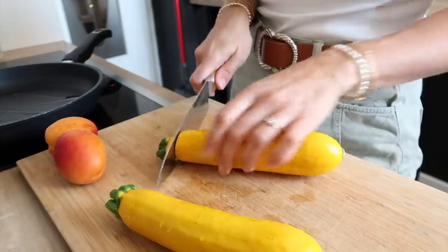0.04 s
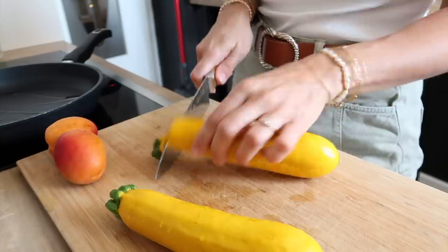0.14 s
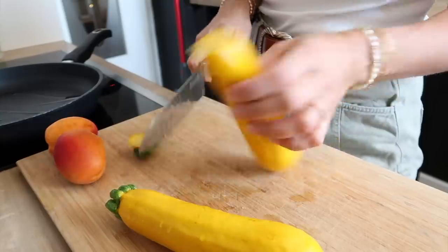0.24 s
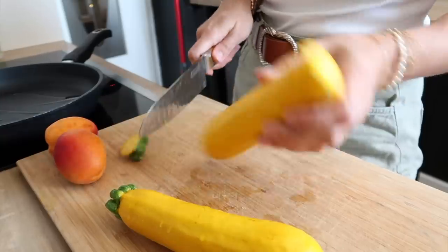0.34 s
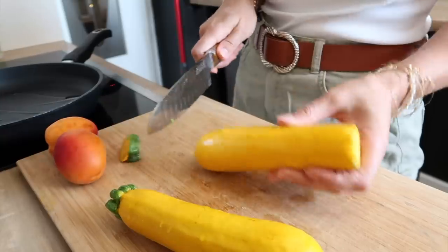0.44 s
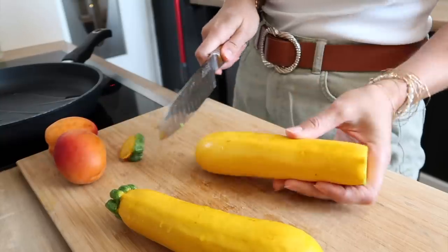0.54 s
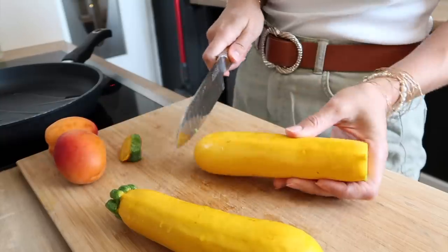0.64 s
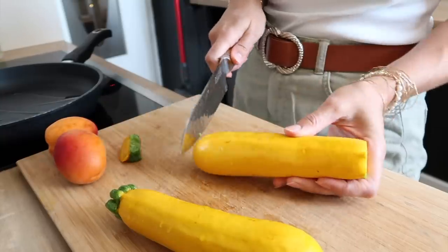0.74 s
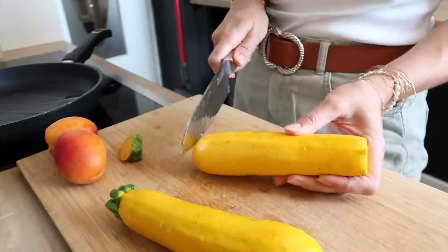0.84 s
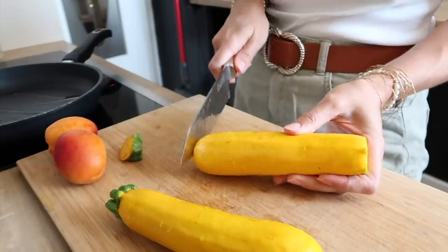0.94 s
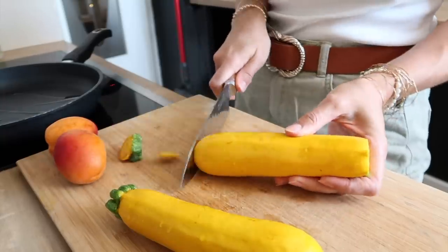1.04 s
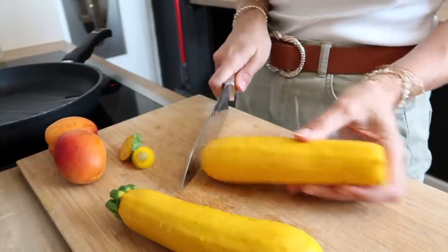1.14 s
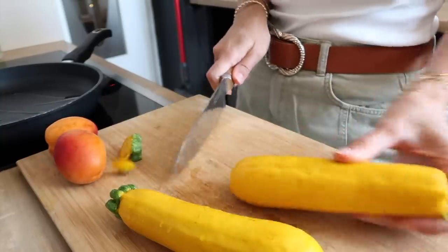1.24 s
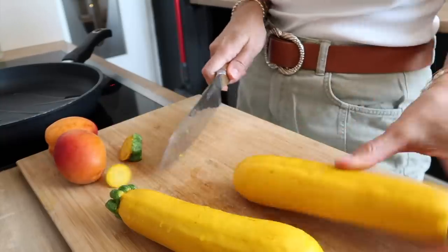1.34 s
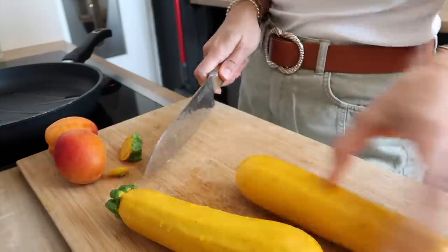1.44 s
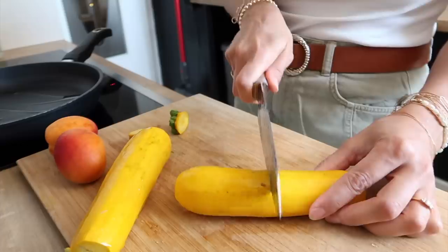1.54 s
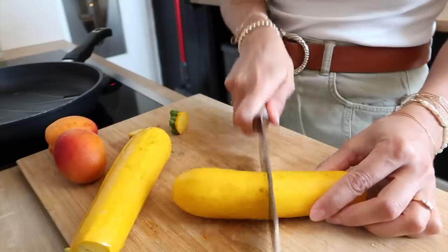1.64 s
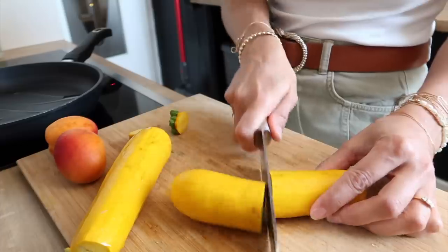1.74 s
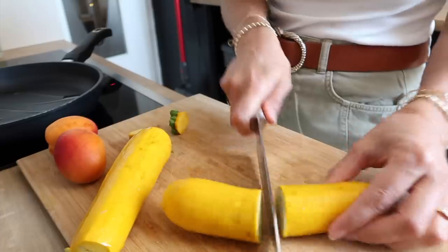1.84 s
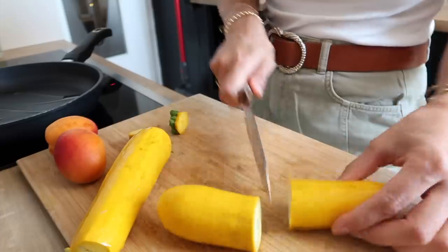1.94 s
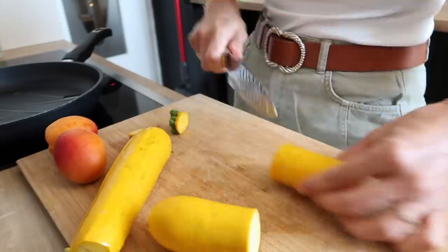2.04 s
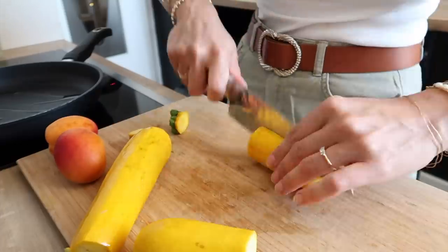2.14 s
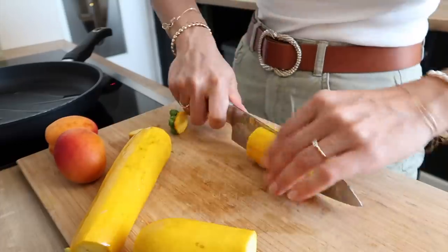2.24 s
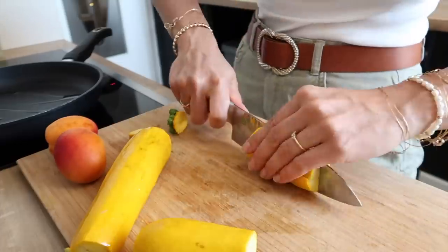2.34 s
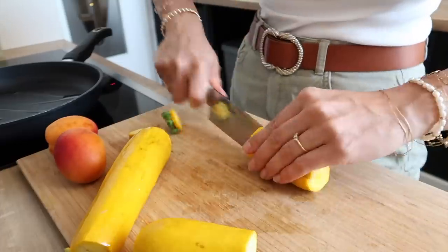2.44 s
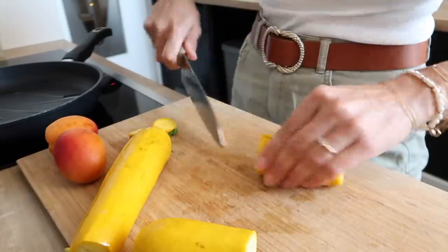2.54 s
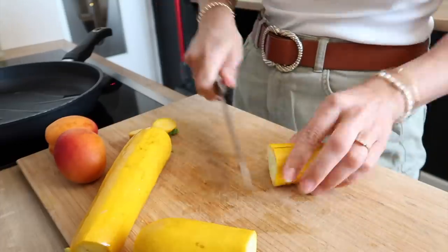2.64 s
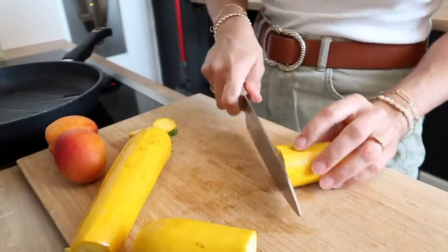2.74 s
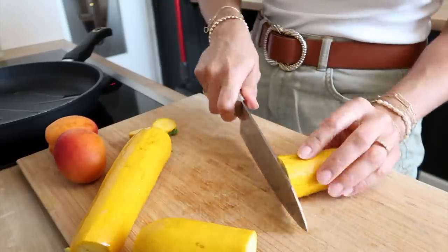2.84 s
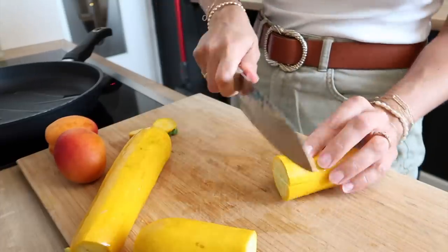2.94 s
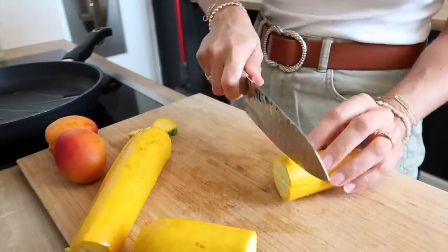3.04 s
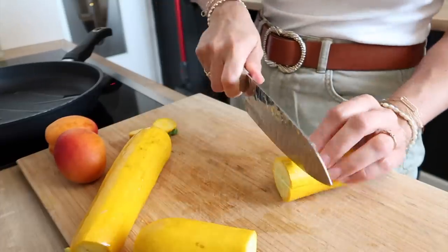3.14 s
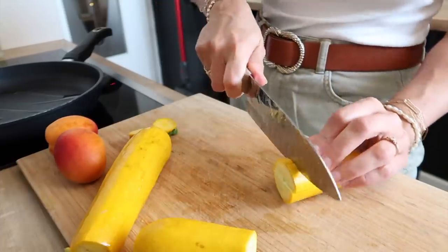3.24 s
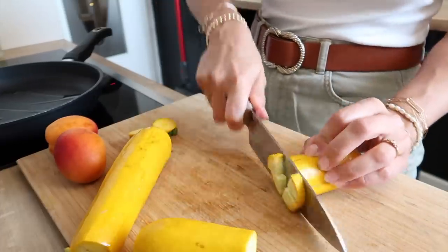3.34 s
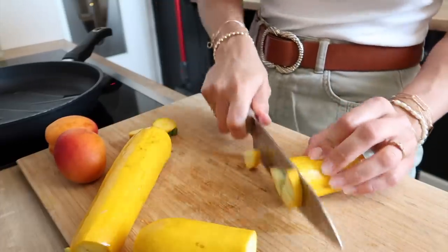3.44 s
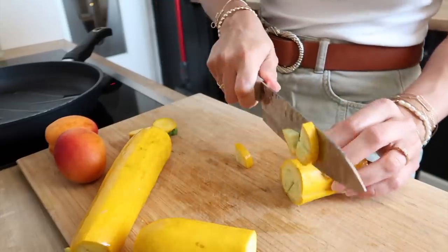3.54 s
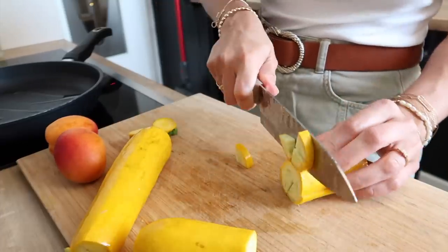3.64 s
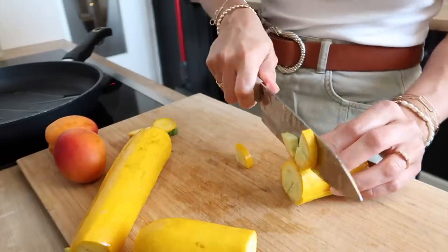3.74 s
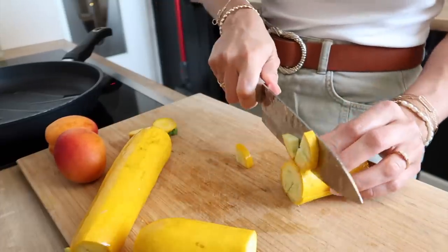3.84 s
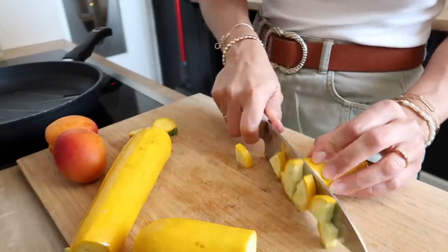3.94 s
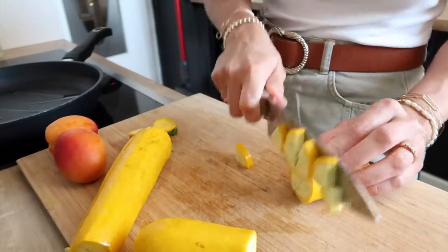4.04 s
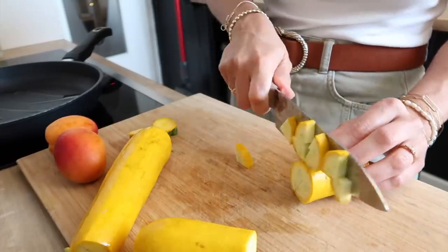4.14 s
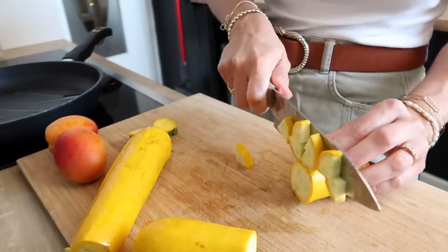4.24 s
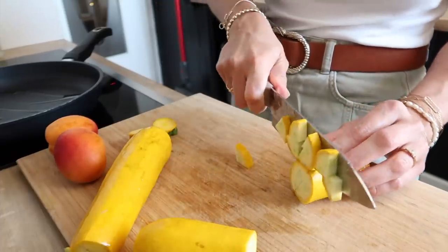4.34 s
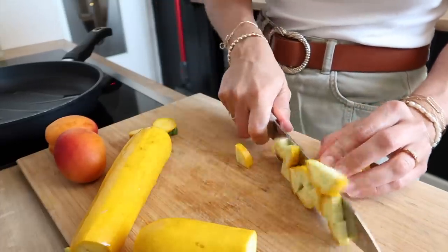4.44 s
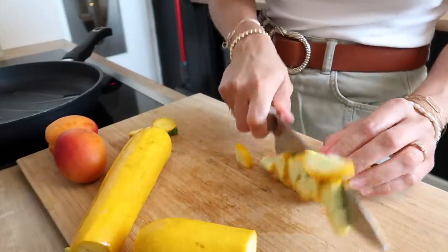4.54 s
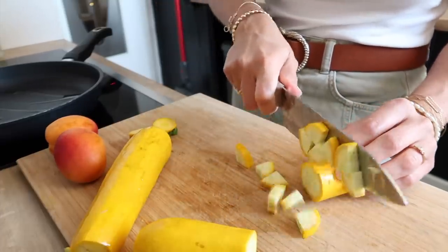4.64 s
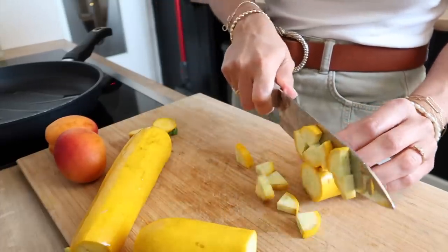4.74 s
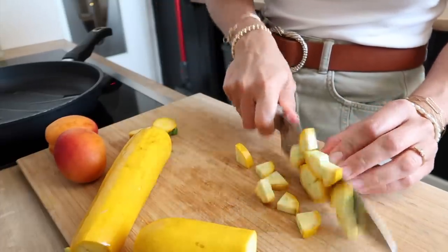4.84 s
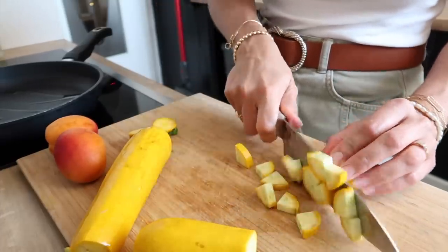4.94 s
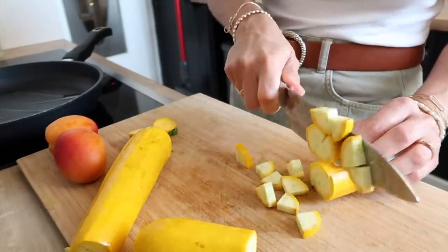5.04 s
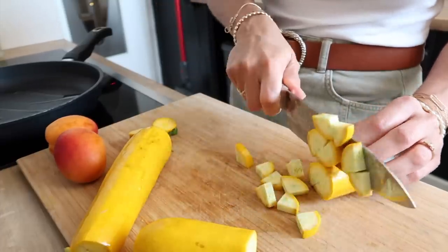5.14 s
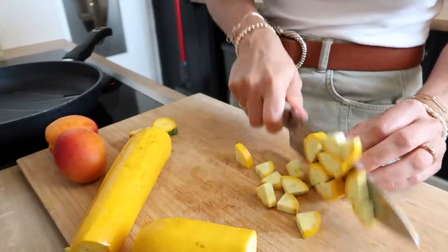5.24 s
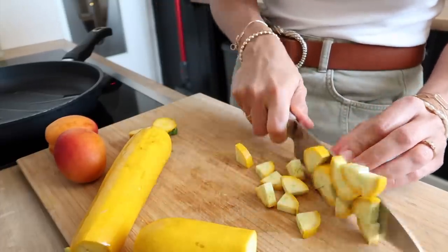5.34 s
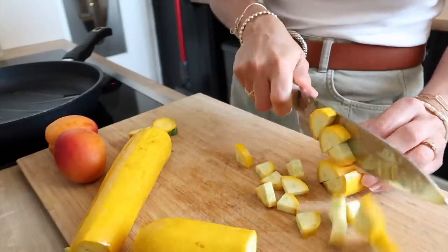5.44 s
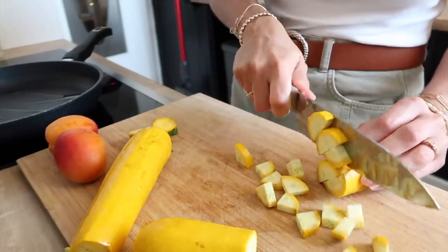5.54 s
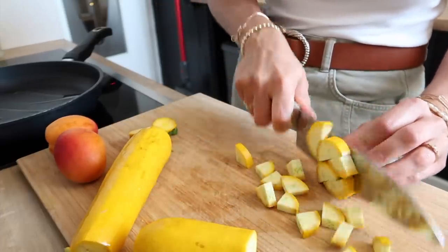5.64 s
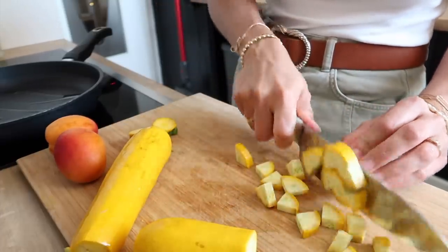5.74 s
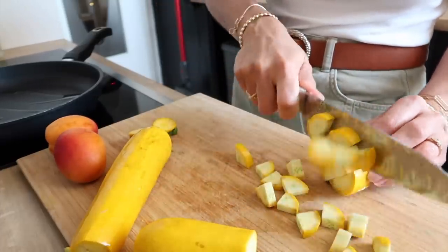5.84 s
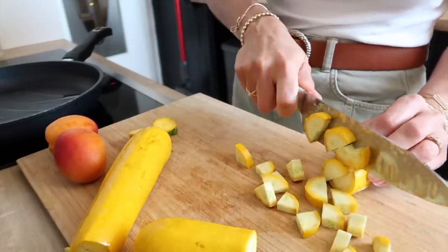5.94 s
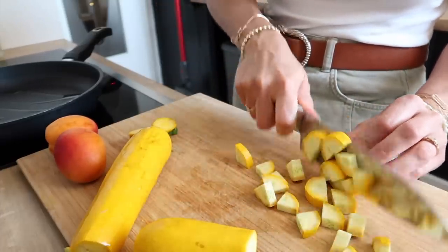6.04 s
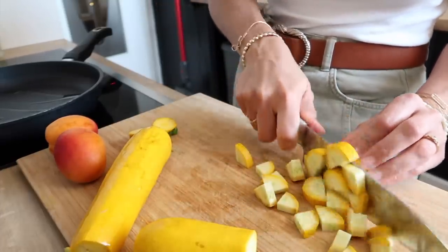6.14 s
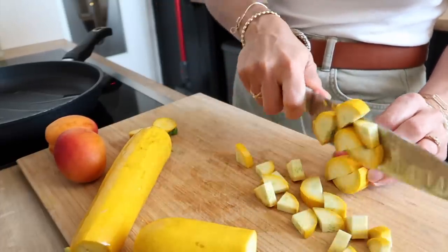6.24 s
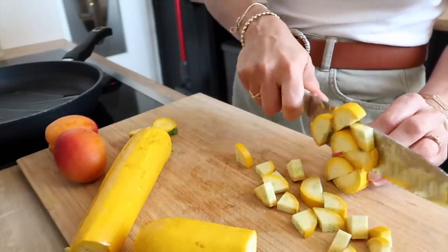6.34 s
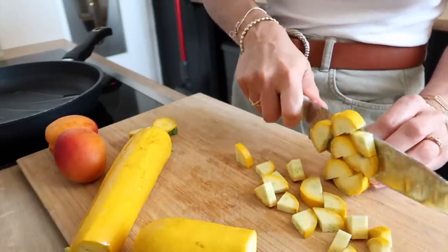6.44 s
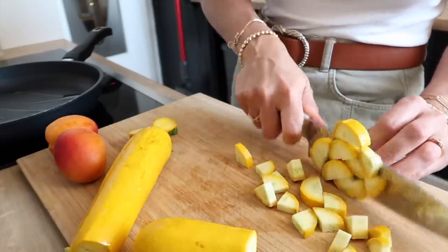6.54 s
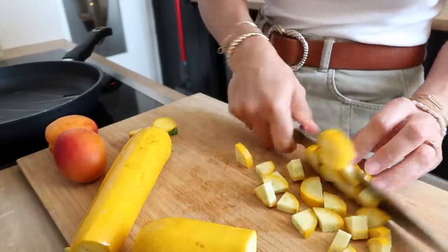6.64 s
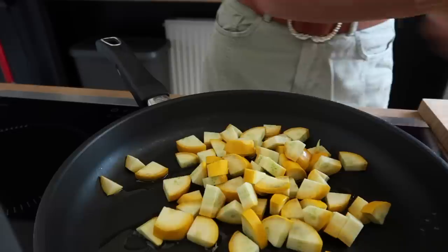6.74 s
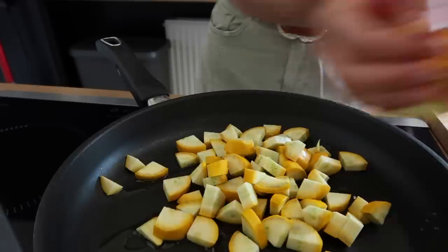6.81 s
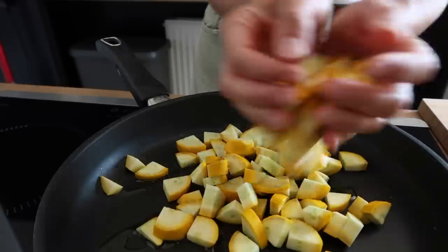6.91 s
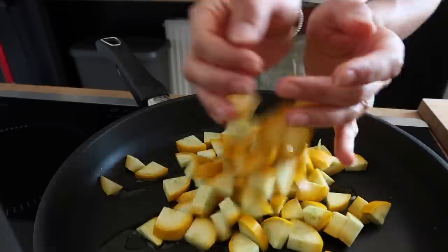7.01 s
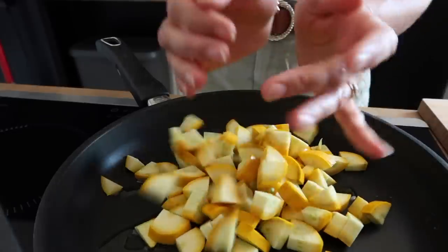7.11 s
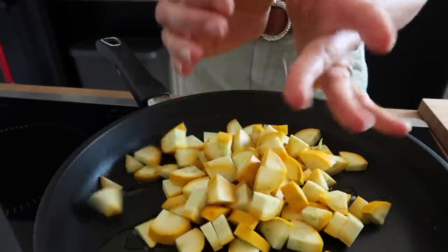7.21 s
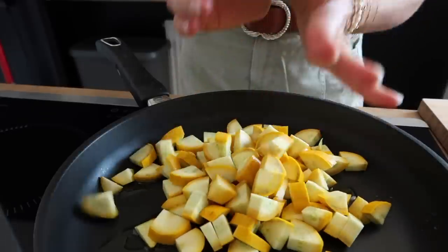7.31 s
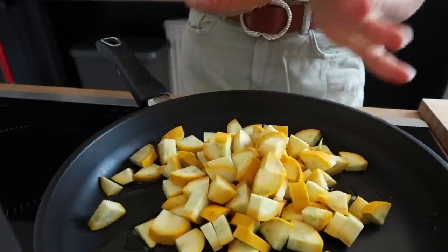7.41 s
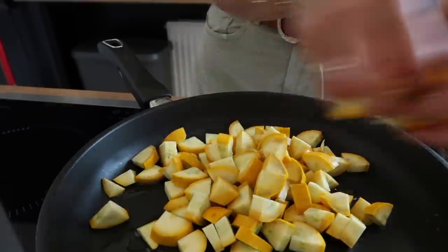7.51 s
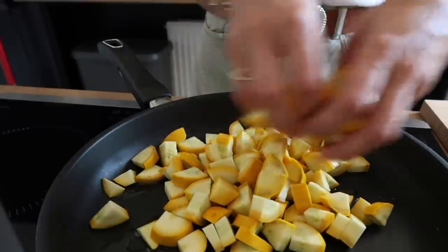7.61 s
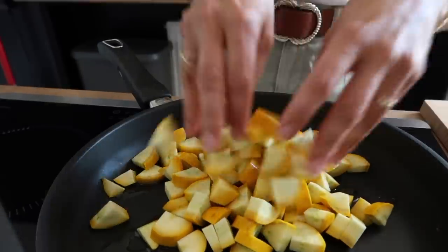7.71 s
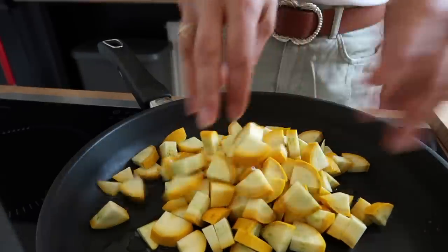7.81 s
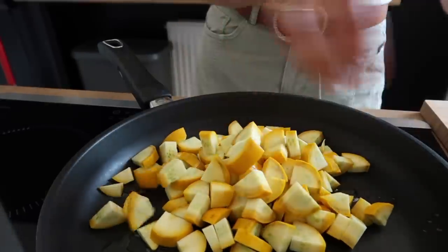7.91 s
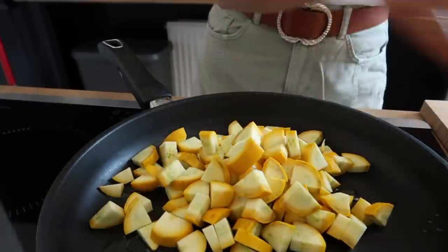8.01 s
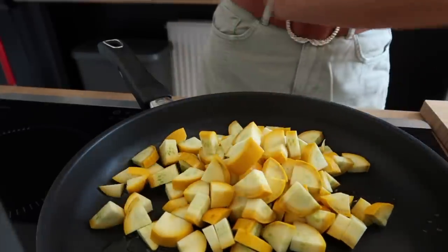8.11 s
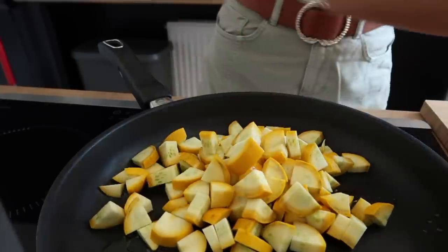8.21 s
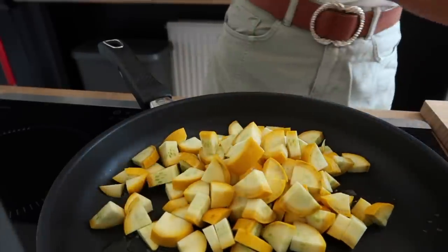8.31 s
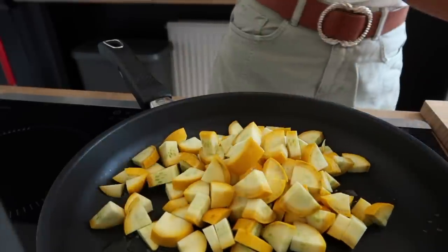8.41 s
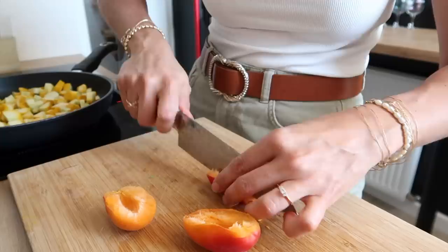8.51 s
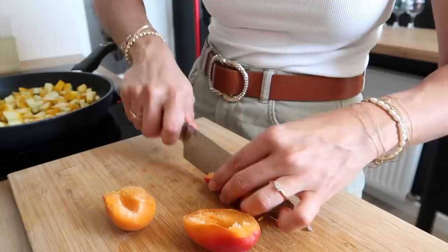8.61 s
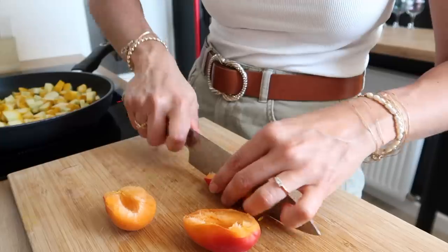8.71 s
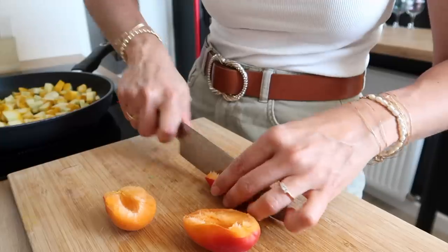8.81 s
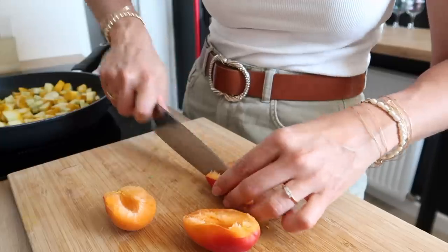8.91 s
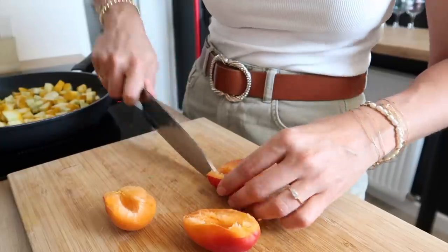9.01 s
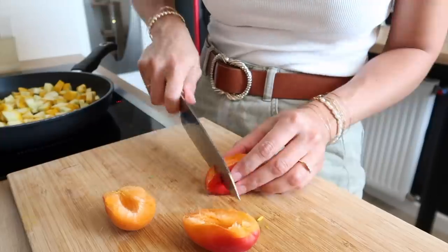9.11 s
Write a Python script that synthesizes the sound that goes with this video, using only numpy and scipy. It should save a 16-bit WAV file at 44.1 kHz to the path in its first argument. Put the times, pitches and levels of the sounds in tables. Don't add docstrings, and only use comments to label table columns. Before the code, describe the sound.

Hard chops of a blade on a thick wooden board, crisp skin snapping, soft pieces thudding into a pan, and two last cuts in a small kitchen.

```python
import sys
import numpy as np
from scipy import signal
from scipy.fft import rfft, irfft, next_fast_len
from scipy.io import wavfile
from scipy.ndimage import uniform_filter1d

SR = 44100
rng = np.random.default_rng(int(sys.argv[2]) if len(sys.argv) > 2 else 0)


def log_audio(samples):
    frames = np.atleast_2d(samples).T
    limited = np.clip(frames, -1, 1)
    pcm = np.round(limited * 32767).astype(np.int16)
    wavfile.write(sys.argv[1], SR, pcm)


def magnitude_from_level(level_db):
    exponent = np.asarray(level_db, float) / 20
    return 10 ** exponent


N = 404397


def evened(x):
    return x / np.sqrt(np.mean(x ** 2) + 1e-20)


def read(points, hz, axis=1):
    columns = np.transpose(points)
    return np.interp(np.log(hz + 1), np.log(columns[0] + 1), columns[axis])


def filtered(x, points, axis=1):
    gain = magnitude_from_level(read(points, np.fft.rfftfreq(len(x), 1 / SR), axis))
    return irfft(rfft(x) * gain, len(x))


def coloured(x, points):
    return evened(filtered(x, points))


def cushioned(x, count):
    contact = np.hanning(count)
    return np.convolve(x, contact / contact.sum())[:len(x)]


def ring(modes, spread=0., spread_db=0., size=SR // 3, sharp=False):
    hz, db, t60 = np.transpose(modes)[:, :, None]
    luck = rng.standard_normal((2, len(modes), 1))
    t = np.arange(size) / SR
    swing = -1 if sharp else (-1) ** np.arange(len(modes))[:, None]
    decay = magnitude_from_level(db + spread_db * luck[0] - 60 * t / t60)
    x = (swing * decay * np.sin(2 * np.pi * hz * (1 + spread * luck[1]) * t)).sum(0)
    return x / abs(x).max()


def burst(points, t60, size):
    x = coloured(rng.standard_normal(size), points) * magnitude_from_level(-60 * np.arange(size) / SR / t60)
    return x / abs(x).max()


def grains(size, per_s, spread_db):
    strength = magnitude_from_level(spread_db * np.minimum(rng.exponential(1, size), 3.5))
    return rng.standard_normal(size) * strength * (rng.random(size) < per_s / SR)


def clock(length):
    return np.arange(2 * round(max(length, .01) * SR / 2)) / SR


def series(hits, body):
    first = hits[0][0]
    x = np.zeros(round((hits[-1][0] - first) * SR) + SR // 3)
    for s, *row in hits:
        blow, at = body(*row), round((s - first) * SR)
        x[at:at + len(blow)] += blow
    return x


# pitch_hz, side_minus_mid_db
STEREO_WIDTH = [(60, -48), (250, -14.5), (700, -14), (1500, -12.5), (3000, -9), (6000, -4), (13000, 1.5)]


def stereo(mid, side):
    side = filtered(side, STEREO_WIDTH)
    return np.array([mid + side, mid - side])


# pitch_hz, level_db (per Hz)
ROOM_AIR = [(25, -21.5), (60, -1), (110, 8), (200, 3.5), (350, -4.5), (700, -7.5), (1500, -12.5),
            (3000, -17.5), (5000, -25), (8000, -30), (12000, -41), (16000, -49.5)]
# pitch_hz, level_db, width_hz
FRIDGE_LINES = [(49.86, -16, 0.64), (98, -9.5, 29), (464, -26.5, 7.7), (483, -19, 4), (717, -27, 13),
                (13011, -49, 3)]
# time_s, level_db
WHINE_LEVEL = [(0, -1), (2.6, 0.5), (2.9, 0), (3.95, -4), (4.05, 4.5), (6.7, 2.5), (6.75, 5), (9.2, -1)]
# start_s, hum_db
GAIN_DUCKS = [(0.0, -51), (1.075, -53.5), (1.515, -42), (1.745, -55.5), (2.148, -38.5), (2.254, -45.5),
              (2.638, -41), (2.9, -45), (3.409, -49.5), (3.99, -54.5), (4.5, -53), (4.92, -56),
              (5.33, -52.5), (5.73, -49.5), (6.13, -52.5), (6.625, -43), (6.711, -48), (7.1, -52.5),
              (7.851, -50), (8.41, -47), (8.546, -38.5), (8.667, -47), (9.085, -41.5)]
# end_s, tail_length_factor (up to there), air_over_hum_db
SCENE_CHANGES = [
    (1.517, 2.1, -8.5),
    (2.147, 1.7, -5.5),
    (2.638, 1.01, -8),
    (6.712, 1.1, -10.5),
    (8.547, 1.17, -0.5),
    (9.083, 2.6, -5.5),
    (9.2, 0.95, -8.5),
]


def background():
    recover_db_s = 11
    size = next_fast_len(N)
    t, hz = np.arange(size) / SR, np.fft.rfftfreq(size, 1 / SR)
    s, ducked_db = np.transpose(GAIN_DUCKS)
    last = np.maximum(np.searchsorted(s, t, "right") - 1, 0)
    hum_db = uniform_filter1d(ducked_db[last] + recover_db_s * (t - s[last]), size=200)

    hum = np.sqrt(2) * np.sin(2 * np.pi * FRIDGE_LINES[0][0] * t)
    whine_db = np.interp(t, *np.transpose(WHINE_LEVEL))
    for line_hz, db, width in FRIDGE_LINES:
        band = 1 + ((hz - line_hz) / width * 2) ** 4
        line = evened(irfft(rfft(rng.standard_normal(size)) / band, size))
        hum = hum + magnitude_from_level(db + (300 < line_hz < 1000) * whine_db) * line

    ends, _, air_db = np.transpose(SCENE_CHANGES)
    shot = np.minimum(np.searchsorted(ends, t), len(ends) - 1)
    lift = magnitude_from_level(hum_db + air_db[shot])
    mid, side = (coloured(rng.standard_normal(size), ROOM_AIR) for _ in range(2))
    return (magnitude_from_level(hum_db) * hum + stereo(lift * mid, magnitude_from_level(8.0) * lift * side))[:, :N]


def all_round(x):
    span, floor = 1.3, 0.15
    size = next_fast_len(len(x) + 8192)
    z = rfft(x, size)
    power, bins = abs(z) ** 2, np.arange(len(z))
    total = np.cumsum(power)
    lo, hi = bins / span - 1, np.minimum(bins * span + 1, bins[-1])
    smooth = (np.interp(hi, bins, total) - np.interp(lo, bins, total)) / (hi - lo) + 1e-20
    return irfft(z * np.sqrt(smooth / (power + floor * smooth)), size)[:len(x)]


# pitch_hz, t60_s, level_db
KITCHEN_ECHOES = [(85, 0.45, -15.5), (350, 0.12, 5), (802, 0.28, 2), (1400, 0.28, 2.5), (2100, 0.24, -2.5),
                  (4130, 0.25, -4.5), (10040, 0.053, -11), (16250, 0.047, -30)]


def kitchen(x, room_db, longer, single):
    cells = 1600 if abs(x).max() > .1 else 800
    taps = np.zeros((2, cells * 16))
    at = np.arange(cells) * 16 + rng.integers(0, 16, (2, cells))
    np.put_along_axis(taps, at, rng.choice([-1., 1.], at.shape), 1)
    taps *= magnitude_from_level(3.5 * evened(cushioned(rng.standard_normal(cells * 16), count=260)))

    hz, t, z = signal.stft(taps, SR, nperseg=256)
    decay = magnitude_from_level(-60 * t / (longer * read(KITCHEN_ECHOES, hz)[:, None]))
    tail = signal.istft(z * decay, SR, nperseg=256)[1]
    t = np.arange(tail.shape[1]) / SR
    tail *= np.clip((t - .004) / 0.00022, 0, 1)
    tail /= np.sqrt(np.sum(tail[0] ** 2) * 3000 / SR * 2)
    tail = np.array([filtered(port, KITCHEN_ECHOES, axis=2) for port in tail])
    t = np.arange(tail.shape[1]) / SR
    tail *= 1 + magnitude_from_level(0.5) * np.exp(-t / 0.012)

    source = all_round(x) if single else x
    wet = signal.fftconvolve(source[None], magnitude_from_level(room_db - 9.5) * tail, axes=1)
    wet = np.pad(wet, ((0, 0), (0, next_fast_len(wet.shape[1]) - wet.shape[1])))
    direct = np.pad(x, (0, wet.shape[1] - len(x)))
    scatter = evened(rng.standard_normal(128)) / np.sqrt(128)
    slant = magnitude_from_level(-3.0) * signal.oaconvolve(direct, scatter)[:len(direct)]
    return stereo(wet[0] + direct, magnitude_from_level(-3.5) * wet[1] + slant)


def add(mix, s, sound, room_db, single=True):
    end, longer, _ = next(change for change in SCENE_CHANGES if change[0] > s)
    sound, s = sound[max(-round(s * SR), 0):], max(s, 0)
    part = mix[:, round(s * SR):round(end * SR)]
    heard = kitchen(sound, room_db, longer, single)[:, :part.shape[1]]
    left_s = end - s - np.arange(heard.shape[1]) / SR
    part[:, :heard.shape[1]] += heard * np.clip(left_s / .002, 0, 1)


# pitch_hz, level_db, t60_s
BOARD_MODES = [(500, -20, .02), (700, -11, .028), (865, -10, .025), (1070, -6, .022), (1220, -3, .02),
               (1460, 0, .022), (1800, -7, .014), (2050, -12, .009), (2270, -11, .012), (2750, -16, .007),
               (3150, -14, .007), (3750, -17, .005), (4300, -20, .005)]
# pitch_hz, level_db (per Hz)
FIBRE_GRIT = [(300, -35), (700, -1), (1400, 2), (2200, -5), (3500, -3), (6000, -26)]
# pitch_hz, level_db (per Hz)
EDGE_CRACK = [(1500, -37), (3000, 1), (4500, 1), (7000, -10), (10000, -15), (16000, -40.5)]


def wood(crack_db, pitch=0.93, size=2048):
    struck = [(hz, read(BOARD_MODES, hz / pitch ** 1.5), t60) for hz, _, t60 in BOARD_MODES]
    board = ring(struck, .015, 1.5, size=size, sharp=True)
    board += magnitude_from_level(-9) * burst(np.multiply(FIBRE_GRIT, [pitch, 1]), .006, size)
    thin = signal.butter(2, 450 * pitch, "high", fs=SR, output="sos")
    board = signal.sosfilt(thin, cushioned(board, count=12))
    return board + magnitude_from_level(crack_db) * burst(EDGE_CRACK, 0.0016, size)


# pitch_hz, level_db, t60_s
WORKTOP_MODES = [(92.5, -1.5, 0.16), (112.8, -5.5, 0.23), (148, -7.5, 0.12), (201, -2, 0.17),
                 (302.2, -11, 0.01), (455, -16.5, 0.034), (554, -15.5, 0.18)]


def knock(db, crack_db, thump_db, room_db, pitch):
    squash = 1.8
    thump = magnitude_from_level(thump_db - 10.0) * ring(WORKTOP_MODES, 0.02, 1.5)
    thump *= np.minimum(np.arange(len(thump)) / SR / 0.014, 1)
    board = wood(crack_db, pitch, size=len(thump))
    blow = cushioned(np.tanh(squash * board) / np.tanh(squash), count=6)
    return magnitude_from_level(db + 3.0) * np.pad(blow + thump, (40, 0)), room_db


# start_s, peak_db, crack_db, pitch_factor (of the spot struck)
CHOP_HITS = [(-0.001, 11.5, -24, 1.24), (1.068, 16.5, -15.5, 1.3), (1.739, 10.5, -9.5, 1.05),
             (2.246, -6, -8, 0.93), (2.896, -9.5, -11.5, 1.07), (3.401, -4.5, -15, 1.12),
             (3.984, -3, -5, 1.13), (4.493, -1.5, -12.5, 1.165), (4.916, -2, -9.5, 1.13),
             (5.324, -1.5, -12, 1.09), (6.126, -4.5, -11, 1.04), (6.617, 1.5, -22, 1.07),
             (8.658, 2.5, -22, 0.92)]
# start_s, peak_db, crack_db, pitch_factor
REBOUND_HITS = [
    (1.072, 5, -20, 3.1),
    (1.077, -7.5, -24.5, 1.5),
    (1.7426, 7.5, -23.5, .9),
    (1.747, -7, -24, .8),
    (1.752, -12.5, -28.5, 1.6),
]


def chop(db, crack_db, pitch):
    return knock(db, crack_db, -19 - 0.65 * db, -11.5 - 0.22 * db, pitch)


# pitch_hz, level_db (per Hz)
FLESH_HISS = [(200, -32), (500, -13), (1200, -3), (2100, 0), (3200, -2), (4500, -7), (6500, -15),
              (10000, -30), (16000, -45)]


def stroke(level, fizz_db, squeak_hz, squeak_db):
    crackle, juice = grains(len(level), 11000, 1.6), grains(len(level), 14000, 1.7)
    fizz = coloured(juice, [(2500, -24), (5000, 0), (8000, -3), (12000, -8), (16000, -18)])
    fizz = fizz * (level / level.max()) ** 0.98
    span = 1.3
    squeak = coloured(crackle, [(20, -80), (squeak_hz / span, -20), (squeak_hz, 0),
                                (squeak_hz * span, -20), (20000, -80)])
    flesh = coloured(crackle, np.multiply(FLESH_HISS, [np.sqrt(squeak_hz / 2800), 1]))
    lumps = magnitude_from_level(3.5 * evened(cushioned(rng.standard_normal(len(level)), count=400)))
    wet = lumps * (flesh + magnitude_from_level(squeak_db) * squeak) + magnitude_from_level(fizz_db) * fizz
    return magnitude_from_level(-3.0) * level * wet, -5


# start_s, length_s, level_db, fizz_db, squeak_hz
SCRAPE_STROKES = [(0.133, 0.12, -43, -13.5, 1940), (0.932, 0.28, -53, -11, 3580),
                  (1.518, 0.44, -48.5, -22.5, 2560), (1.661, 0.13, -27.5, -9.5, 2700),
                  (2.14, 0.049, -31, -15, 1490), (2.416, 0.21, -42.5, -19, 2130),
                  (4.437, 0.068, -39, -9.5, 2990), (6.532, 0.11, -44.5, -14, 3030),
                  (8.289, 0.2, -38.5, -40, 1160), (8.798, 0.26, -46.5, -25.5, 2070),
                  (8.911, 0.22, -45, -25, 2370)]


def scrape(length, db, fizz_db, squeak_hz):
    t = clock(length)
    shape = np.minimum(np.minimum(t / 0.07, (t[-1] - t) / 0.1), 1)
    return stroke(magnitude_from_level(db) * shape, fizz_db, squeak_hz, -6.5)


# pitch_hz, level_db, t60_s
BLADE_MODES = [(1830, -10, 0.017), (3240, 3.5, 0.048), (4300, 5, 0.096), (5200, -3.5, 0.09),
               (5540, 2, 0.068), (6380, 0, 0.3), (7200, -2.5, 0.06), (7640, 4, 0.057), (8300, -7, 0.18),
               (9200, -7.5, .08), (10900, -11, .05), (11400, -12.5, .06), (11950, -21, 0.066),
               (13300, -16.5, 0.077)]
# start_s, peak_db, length_s, brightness_db_per_octave, ring_time_factor
BLADE_BRUSHES = [
    (0.16, -44, 0.086, 2, 1),
    (0.928, -40.5, 0.015, -19, 1),
    (2.565, -49, 0.022, 13, 0.25),
    (2.758, -37, 0.023, -11, 0.42),
    (5.535, -56, 0.012, -9, 0.55),
]


def brush(db, length, bright_db, longer):
    t = np.arange(SR // 8) / SR
    push = rng.standard_normal(SR // 8) * np.exp(-3 * abs(t / length - .7) ** 2)
    steel = [(hz, level_db + bright_db * np.log2(hz / 4000), t60 * longer)
             for hz, level_db, t60 in BLADE_MODES]
    x = signal.fftconvolve(push, ring(steel, .004, 2))
    x *= magnitude_from_level(2.5 * evened(cushioned(rng.standard_normal(len(x)), count=300)))
    return magnitude_from_level(db) * x / abs(x).max(), -7


# start_s, peak_db, thump_db, pitch_factor
LAID_DOWN = [
    (0.19, -25, 4, 1.07),
    (0.293, -18, -7.5, 0.79),
    (0.468, -18, 9.5, 1.2),
    (0.525, -38, 19, 0.24),
    (.577, -17, -21, 1.32),
    (1.447, -8, 6, 1.43),
    (1.481, -33, 11, 1.7),
    (2.754, -6.5, -16, 1.085),
    (5.722, -9.5, -4.5, 0.8),
]


def lay(db, thump_db, pitch):
    sound, room_db = knock(db, -33, thump_db, -8, pitch)
    return cushioned(sound, count=14), room_db


# pitch_hz, level_db (per Hz)
SKIN_CLICK = [(500, -22), (1500, -0.5), (2900, 9.5), (4200, -5), (7000, -32), (14000, -41)]
# start_s, peak_db, pitch_factor
PAN_CLICKS = [(6.999, -39, 1.2), (7.026, -31, 1.2), (7.044, -28, 0.98), (7.055, -39, 1.4),
              (7.082, -28, 1.4), (7.132, -17.5, .95), (7.302, -32.5, 0.79), (7.349, -42.5, 1.3),
              (7.365, -45, 1.63), (7.716, -30.5, 1.3), (7.809, -35, 0.86), (7.874, -35, 1.3)]


def click(db, pitch):
    crack = burst(np.multiply(SKIN_CLICK, [pitch, 1]), 0.012, 1024)
    return magnitude_from_level(db) * cushioned(crack, count=6)


CLICK_ECHO_DB = -11
# start_s, peak_db, pitch_factor
LONE_TICKS = [
    (0.474, -30.5, 0.63),
    (0.576, -32, 0.65),
    (1.511, -35, 1.5),
    (1.4, -31, 0.84),
    (2.2, -36, 1.4),
    (2.757, -23, 1.1),
    (5.567, -26.5, 0.78),
    (4.9, -45, 1.1),
]


def tick(db, pitch):
    return click(db, pitch), CLICK_ECHO_DB


def tap(db, hz, t60, room_db):
    modes = [(hz, 0, t60), (hz * 1.5, -7, .6 * t60), (hz * .65, -7, .8 * t60)]
    piece = ring(modes, .04, 2, size=2048)
    piece += magnitude_from_level(-2.0) * burst(np.multiply(FIBRE_GRIT, [hz / 1200, 1]), 0.012, 2048)
    return magnitude_from_level(db + 1.5) * cushioned(piece, count=12), room_db


# start_s, peak_db, pitch_hz
BOARD_TAPS = [(.721, -48.5, 1540), (2.149, -31.5, 1610), (2.574, -23, 2540), (2.581, -24, 1245),
              (3.285, -41, 1970), (3.374, -23, 2420), (3.814, -47, 2850), (4.711, -40, 1113),
              (4.743, -38.5, 1134), (5.52, -43.5, 600), (5.569, -32, 2330), (5.792, -36.5, 1070),
              (5.928, -31.5, 1094), (9.063, -52, 1570)]


def touch(db, hz):
    return tap(db, hz, 0.035, -7)


# pitch_hz, level_db, t60_s
RIND_MODES = [(1463, -6, .015), (1890, -1.5, 0.069), (2410, -8.5, 0.0075), (3060, -8.5, 0.018),
              (3300, -3, .02), (4400, -17.5, 0.0079), (6200, -24.5, .01)]
# start_s, length_s, level_db, pitch_factor
SKIN_RASPS = [
    (0.925, 0.12, -56.5, 1.05),
    (1.528, 0.13, -47.5, 1.09),
    (2.411, 0.18, -45.5, 0.74),
    (2.466, 0.084, -48, 1.18),
    (8.847, 0.22, -45, 1.1),
    (8.937, 0.0884, -43.5, 0.72),
]


def rasp(length, db, pitch):
    t = clock(length)
    skin = ring(np.multiply(RIND_MODES, [pitch, 1, .6]), 0.0076, 1.6, size=1024)
    bands = signal.fftconvolve(grains(len(t), 3600, 2), skin)[:len(t)]
    return magnitude_from_level(db) * evened(bands) * signal.windows.tukey(len(t), .6), -4.5


# start_s, length_s, final_db, fizz_db
FLESH_SLICES = [
    (1.03, .03, -36.5, -7.5),
    (3.32, 0.081, -28, -1),
    (3.911, 0.06, -32.5, -10),
    (4.845, 0.058, -38, -14),
    (5.255, 0.057, -35, -16.5),
    (5.65, 0.074, -34, -22),
    (6.047, 0.096, -27, -16.5),
    (8.606, 0.067, -27.5, -22),
    (9.123, 0.049, -42.5, 5.5),
]


def slice_through(length, db, fizz_db):
    rise_db_s = 277
    t = clock(length)
    left = t[-1] - t
    bite = np.minimum(t / 0.11, 1) * np.minimum(left / 0.0035, 1)
    return stroke(magnitude_from_level(db - rise_db_s * left) * bite, fizz_db, 2600, -11.5)


# start_s, length_s, level_db, fizz_db, squeak_hz
BLADE_PLUNGES = [
    (1.054, 0.016, -21.5, -19.5, 1704),
    (2.182, 0.057, -39.5, -16.5, 3300),
    (2.193, .05, -43, -28.5, 1400),
    (3.335, .045, -50, -6, 2820),
    (8.947, 0.045, -40.5, -28, 1310),
    (8.413, 0.04, -44, -32, 2380),
]
# start_s, length_s, level_db, fizz_db, squeak_hz
PIECE_SHOWERS = [
    (6.986, 0.019, -42.5, -20, 2200),
    (7.02, 0.041, -40.5, -19.5, 2360),
    (7.07, 0.047, -48, -20.5, 2440),
    (7.136, .06, -53, -9.5, 2650),
    (8.317, 0.019, -47.5, -26, 2370),
    (9.053, 0.032, -37.5, -30, 1530),
]


def plunge(length, db, fizz_db, squeak_hz):
    t = clock(length)
    shape = np.minimum(np.minimum(t, t[-1] - t) / 0.012, 1)
    return stroke(magnitude_from_level(db) * shape, fizz_db, squeak_hz, -6.5)


def blows(db, crack_db, length, pitch):
    t = np.arange(2048) / SR / length
    run = rng.standard_normal(len(t)) * t ** 0.37 * np.exp(-t ** 2)
    x = signal.fftconvolve(run, wood(crack_db, pitch))
    return magnitude_from_level(db) * x / abs(x).max()


# start_s, peak_db, crack_db, length_s
FLESH_SPLITS = [(1.057, -16, 2, 0.01), (1.4439, -17, -25.5, 0.0015), (1.732, -8, -13.5, 0.0055),
                (2.888, -18, -21, 0.0057), (3.396, -15.5, -20.5, 0.013), (3.977, -18, -5, 0.0077),
                (4.487, -19.5, -15, 0.0092), (4.909, -27.5, -10.5, 0.013), (5.32, -22, -26, 0.006),
                (5.714, -13.5, -33, 0.015), (6.124, -19, -24.5, 0.0165), (6.614, -18, -11.5, 0.01)]


def split(db, crack_db, length):
    return blows(db, crack_db, length, .93), -4


# start_s, peak_db
SKIN_SNAPS = [(1.676, -29), (1.682, -20), (1.685, -19), (1.691, -17.5), (1.696, -23), (1.7, -13),
              (1.705, -14.5), (1.709, -25), (1.713, -19.5), (1.718, -23.5), (1.722, -22.5), (1.727, -19.5),
              (1.731, -22)]


def snap(db):
    skin = ring(RIND_MODES, 0.013, 1.7, size=2048)
    return magnitude_from_level(db) * cushioned(skin + magnitude_from_level(-10.5) * burst(EDGE_CRACK, .002, 2048), count=6)


DROP_ECHO_DB = -7
# start_s, peak_db, pitch_hz
PAN_DROPS = [(6.932, -36.5, 3180), (6.99, -32.5, 1210), (7.024, -23.5, 910), (7.035, -33, 2430),
             (7.053, -38, 1290), (7.072, -26, 2220), (7.084, -30, 1800), (7.133, -22.5, 2960),
             (7.149, -46, 2480), (7.248, -31, 724), (7.304, -34.5, 855), (7.331, -32, 1590),
             (7.38, -36, 2450), (7.417, -35.5, 1380), (7.7, -32, 3230), (7.715, -34, 2430),
             (7.763, -32.5, 3430), (7.835, -29.5, 2430), (7.849, -49, 2230), (7.874, -28, 694),
             (7.978, -33.5, 740), (8.205, -28, 655), (8.252, -35, 3030)]


def drop(db, hz):
    return tap(db, hz, 0.0064, DROP_ECHO_DB)[0]


# pitch_hz, level_db, t60_s
PAN_MODES = [(88.4, 0.5, 0.23), (147.8, -3, 0.36), (179.5, -8, 0.058), (249, -7.5, 0.15), (349, -11, 0.081),
             (474, -8.5, 0.061), (752, -18, 0.15), (999, -18, 0.057), (1210, -16, 0.05)]
# start_s, peak_db
PAN_THUDS = [(6.989, -30), (7.022, -27), (7.031, -31), (7.05, -33), (7.068, -26), (7.089, -22.5),
             (7.113, -23), (7.133, -26.5), (7.152, -21), (7.176, -22.5), (7.187, -29), (7.246, -25.5),
             (7.301, -20), (7.319, -21), (7.345, -24.5), (7.381, -27.5)]


def thud(db):
    return magnitude_from_level(db) * cushioned(ring(PAN_MODES, 0.019, 1.7), count=30)


# start_s, length_s, level_db, clatter_db
PAN_POURS = [
    (6.996, 0.31, -35, 3),
    (7.199, 0.083, -36, -5),
    (7.292, 0.22, -34, -8.5),
    (7.691, 0.17, -39, -10),
    (7.808, 0.21, -32, -5.5),
    (8.195, 0.11, -30.5, -0.5),
    (8.303, 0.34, -35.5, 9),
]


def tumble(length, db, clatter_db):
    hold, fade_db = 0.21, -9
    t = clock(length)
    fade = fade_db * np.maximum(t / length - hold, 0) / (1 - hold)
    level = np.minimum(t / 0.013, 1) * magnitude_from_level(db + fade)
    thuds = uniform_filter1d(grains(len(t), 300, 0.96), size=60)
    boom = evened(signal.fftconvolve(thuds, ring(PAN_MODES))[:len(t)])
    clumps = signal.lfilter([1], [1, -np.exp(-1 / (0.01 * SR))], abs(grains(len(t), 67, 0.86)))
    clicks = grains(len(t), 4000, 2.6) * (.3 + clumps)
    clatter = coloured(clicks, [(200, 13.5), (500, 10.0), (1200, 0.0), (3000, 3.5), (5000, -5.5),
                                (8000, -18), (14000, -65)])
    heap = boom + magnitude_from_level(clatter_db - 15.5) * clatter
    return level * heap * signal.windows.tukey(len(t), .06), -5


# start_s, peak_db, length_s, pitch_factor
HEAP_BUMPS = [
    (8.405, -18, 0.007, 0.58),
    (8.409, -14, 0.009, 0.91),
    (8.424, -16.5, 0.0034, 0.85),
    (8.432, -29, 0.0097, 1),
    (8.526, -20, 0.0053, 0.54),
    (8.532, -21.5, 0.0056, 0.76),
]


def bump(db, length, pitch):
    return blows(db, -50, length, pitch), -8.5


def scene():
    mix = background()
    for source, events in ((chop, CHOP_HITS), (scrape, SCRAPE_STROKES), (brush, BLADE_BRUSHES), (lay, LAID_DOWN),
                           (tick, LONE_TICKS), (touch, BOARD_TAPS), (rasp, SKIN_RASPS),
                           (slice_through, FLESH_SLICES), (plunge, BLADE_PLUNGES), (split, FLESH_SPLITS),
                           (chop, REBOUND_HITS), (plunge, PIECE_SHOWERS), (tumble, PAN_POURS), (bump, HEAP_BUMPS)):
        for s, *row in events:
            add(mix, s, *source(*row))
    for body, hits, room_db in ((snap, SKIN_SNAPS, -6.5), (drop, PAN_DROPS, DROP_ECHO_DB),
                                (thud, PAN_THUDS, -5.5), (click, PAN_CLICKS, CLICK_ECHO_DB)):
        add(mix, hits[0][0], series(hits, body), room_db, single=False)
    return mix


def top_cut(x):
    return signal.sosfilt(signal.butter(12, 16500, fs=SR, output="sos"), x)


def record(dry):
    thinned = signal.sosfilt(signal.butter(3, 36, "high", fs=SR, output="sos"), dry)
    return top_cut(np.clip(thinned, -1, 1))


dry = scene()
out = record(dry)
log_audio(out)
```